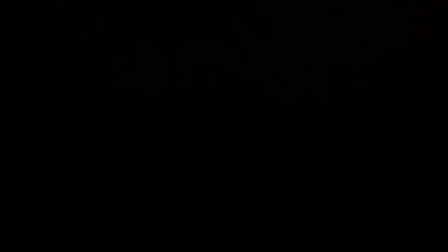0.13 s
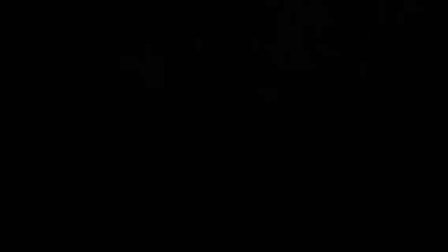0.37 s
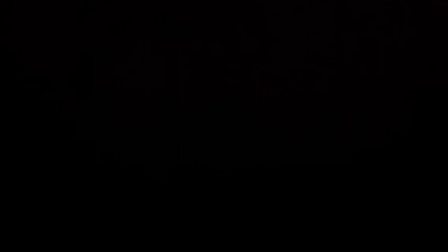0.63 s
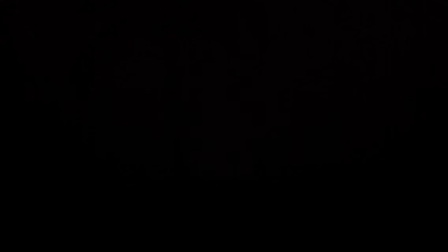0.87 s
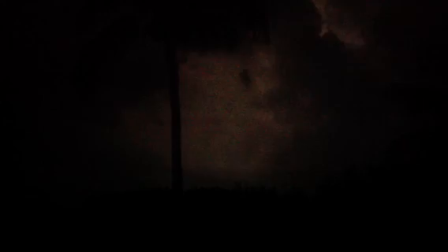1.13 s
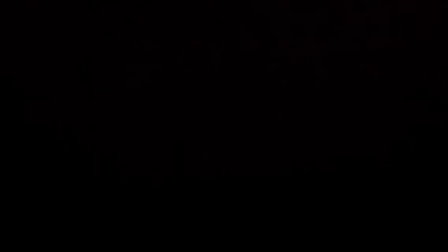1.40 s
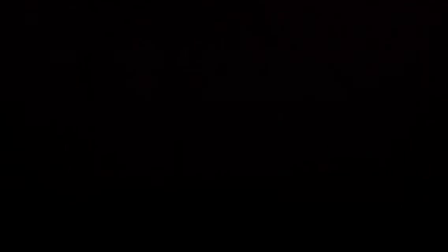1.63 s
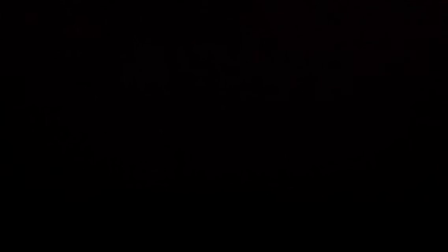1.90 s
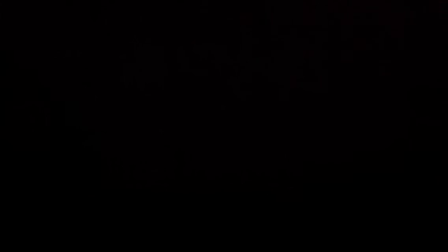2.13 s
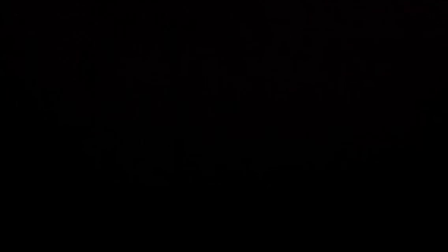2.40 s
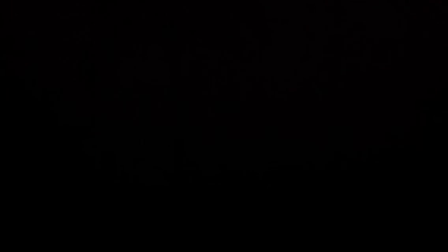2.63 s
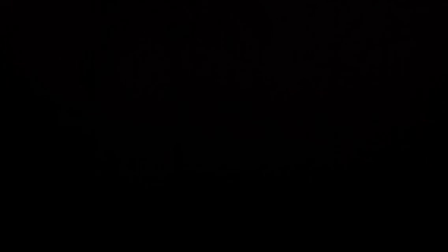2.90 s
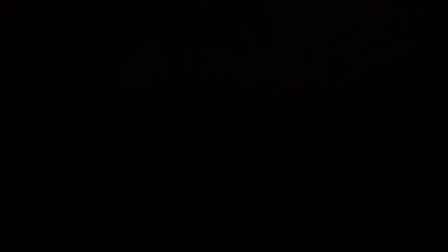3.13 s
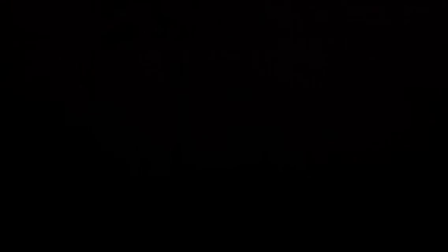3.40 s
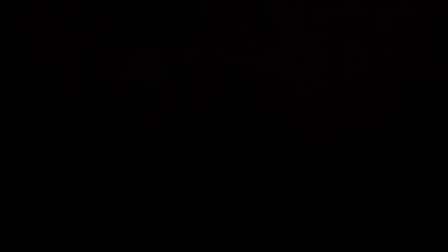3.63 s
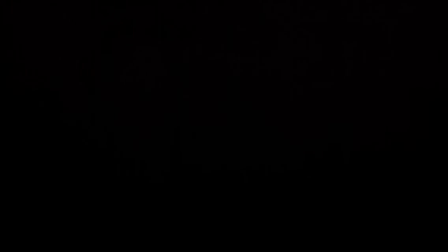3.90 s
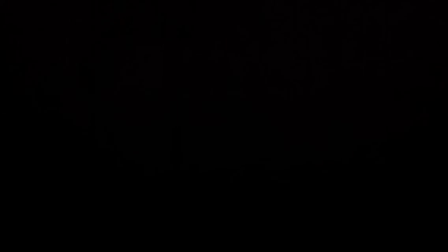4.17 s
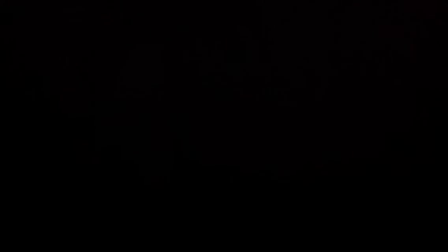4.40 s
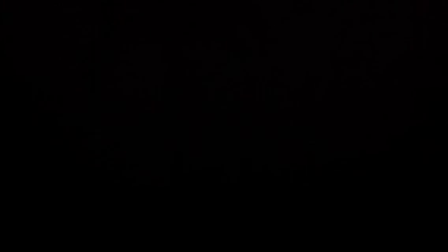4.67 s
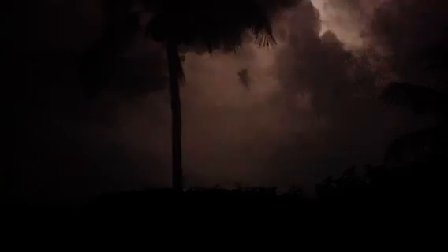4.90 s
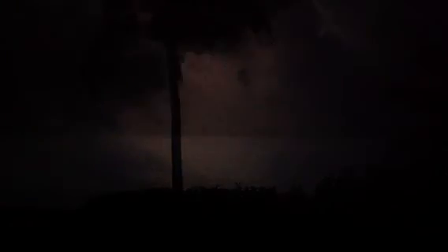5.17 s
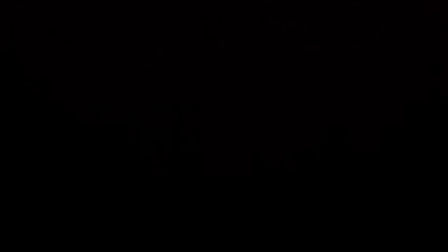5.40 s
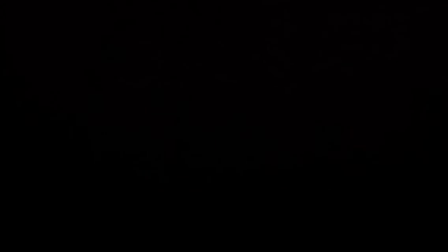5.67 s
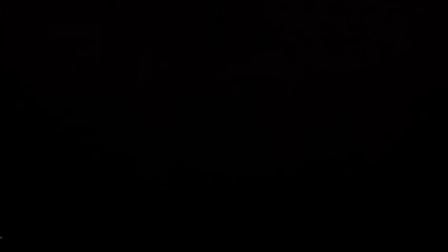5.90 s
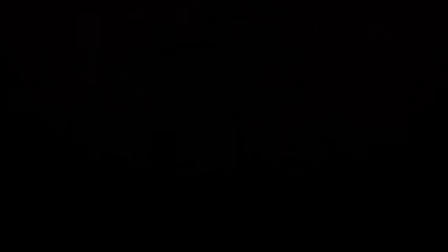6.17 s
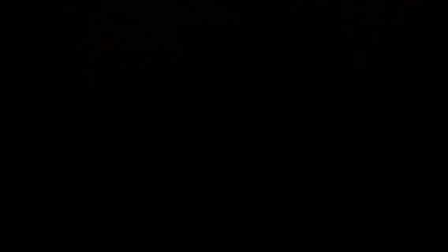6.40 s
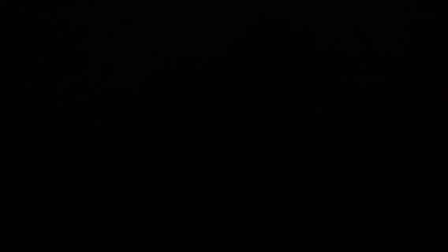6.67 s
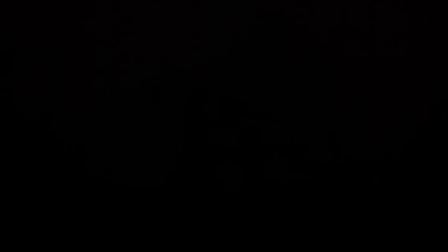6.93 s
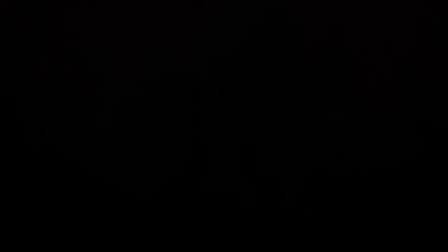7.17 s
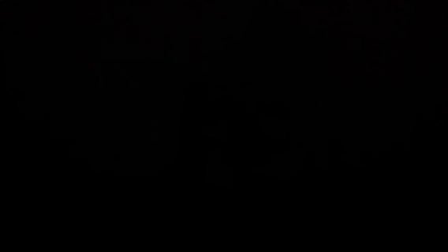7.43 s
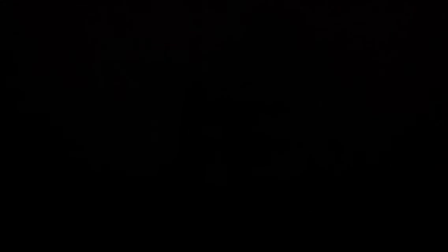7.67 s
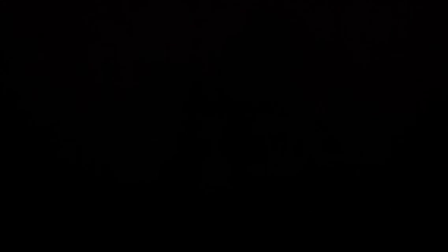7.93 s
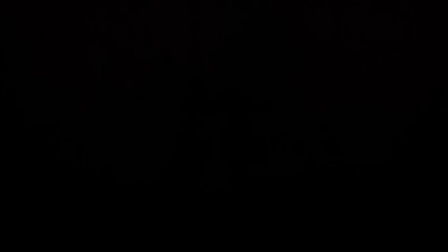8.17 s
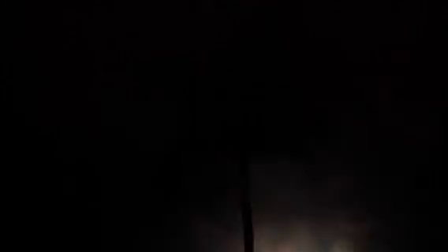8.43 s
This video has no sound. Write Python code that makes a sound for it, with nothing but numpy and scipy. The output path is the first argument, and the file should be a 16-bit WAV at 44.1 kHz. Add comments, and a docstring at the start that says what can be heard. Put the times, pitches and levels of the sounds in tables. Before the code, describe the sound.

Night crickets near and far sing over low wavering thunder, with faint motor whine, sparse leaf drips and far rain slowly growing.

```python
"""A stormy night in a garden: from the start crickets chirp near and far, mostly in pairs of wing strokes,
while uneven thunder rolls with passing hums, a small motor whines and throbs, and microphone noise hisses.
Drops soon tick on leaves as bursts of noise; one plinks into water at 2 s, and the boom is strongest at 2.8 s.
A higher cricket sings often from 4 s on, as far rain, a pattering noise, grows louder.
After 6 s some steady motor tones swell and others sink; near the end the thunder booms again."""
import sys
import numpy as np
from scipy import signal
from scipy.fft import rfft, irfft, next_fast_len
from scipy.io import wavfile
from scipy.ndimage import uniform_filter1d, map_coordinates

SR = 44100
rng = np.random.default_rng(int(sys.argv[2]) if len(sys.argv) > 2 else 0)


def how_loud(loudness_db):
    """Turn decibels into a plain amplitude multiplier (0 dB gives 1, 20 dB gives 10)."""
    steps = np.asarray(loudness_db, float) / 20
    return 10 ** steps


def to_wav(sig):
    """Store sig (one row per channel, or 1-D mono) as 16-bit WAV at the path in sys.argv[1].

    Samples outside -1..1 are clipped; the rate is SR.
    """
    pcm = np.clip(np.atleast_2d(sig), -1, 1) * 32767
    pcm = np.round(pcm).astype(np.int16)
    wavfile.write(sys.argv[1], SR, pcm.T)  # frames by channels


N = 377055


def unit(x):
    """Bring to rms 1."""
    return x / np.sqrt(np.mean(x ** 2) + 1e-20)


def curves(rows):
    """Draw straight lines between table rows: one curve for each column after the time."""
    times, *columns = np.transpose(rows)
    return [np.interp(np.arange(N) / SR, times, column) for column in columns]


def wobble(rate_hz):
    """A smooth random curve through rate_hz random points a second."""
    points = rng.standard_normal(int(N * rate_hz / SR) + 4)
    return map_coordinates(points, [np.arange(N) * rate_hz / SR])


def noise(colour, lo_hz=0, hi_hz=SR):
    """Random noise with its spectrum shaped by a colour table, kept between two soft edges."""
    size = next_fast_len(N)
    hz = np.fft.rfftfreq(size, 1 / SR) + 1  # 1 Hz up, to avoid the log of zero
    table_hz, table_db = np.transpose(colour)
    gain = how_loud(np.interp(np.log(hz), np.log(table_hz), table_db))
    gain = gain / np.sqrt((1 + (lo_hz / hz) ** 12) * (1 + (hz / hi_hz) ** 12))
    return irfft(rfft(rng.standard_normal(size)) * gain, size)[:N]


def leaves(x, t60_s, wet_db):
    """Leaves scatter sound: the direct sound plus a dying noise tail, new every third of a second."""
    t, step = np.arange(SR // 2) / SR, SR // 3
    out = np.pad(x, (0, SR))
    for i in range(0, N, step):
        tail = rng.standard_normal(len(t)) * how_loud(-60 * t / t60_s)
        wet = signal.fftconvolve(x[i:i + step], tail / np.linalg.norm(tail))
        out[i:i + len(wet)] += how_loud(wet_db) * wet
    return out[:N]


def strokes(rows, hz, fall_hz, spread_hz, length_s=.032, octave=0):
    """Each wing stroke makes the wing ring: a short, almost pure tone whose pitch slides, fast at first."""
    out = np.zeros(N + SR)
    u = np.linspace(0, 1, round(length_s * SR))  # progress through one stroke
    ramp = np.clip(np.minimum(u, 1 - u) / .38, 0, 1)
    shape = np.sin(np.pi / 2 * ramp) ** 2  # soft start and end, level between
    for (time, db), (detune, start) in zip(rows, rng.standard_normal((len(rows), 2))):
        pitch = hz + spread_hz * detune + fall_hz * ((1 - u) ** 2 - .3)
        phase = 2 * np.pi * (np.cumsum(pitch) / SR + start)
        first = max(round(time * SR - len(u) / 2), 0)
        tone = np.sin(phase) + octave * np.sin(2 * phase)
        out[first:first + len(u)] += how_loud(db) * shape * tone
    return out[:N]


# Colour of the microphone noise: (pitch [Hz], level [dB per Hz])
MIC_COLOUR = [(420, -92), (700, -94.5), (1300, -98), (2000, -103), (3500, -107), (8000, -110),
              (12000, -109), (15000, -112)]


def microphone_hiss():
    """The microphone's own noise is steady and random."""
    return np.sqrt(SR / 2) * noise(MIC_COLOUR, lo_hz=400)  # the factor makes the table levels per Hz


# Loudness of the far rain before its patter: (time [s], level [dB])
RAIN_LEVEL = [(0, -72.5), (4.2, -67.5), (6.8, -65), (8.55, -64.5)]
# Colour of the far rain, its overall loudness set above: (pitch [Hz], relative level [dB per Hz])
RAIN_COLOUR = [(1200, -19), (2500, -0.5), (5500, 0.5), (7200, -2), (9000, -6), (13000, -14.5)]


def far_rain():
    """Far rain on leaves blends into noise that patters unevenly and slowly comes nearer."""
    level_db, = curves(RAIN_LEVEL)
    patter_db = 1.6 * wobble(30)
    return how_loud(level_db + patter_db) * unit(noise(RAIN_COLOUR))


def crowd(hz, spread_hz, count):
    """Far crickets chirp pairs of strokes at random moments, mostly heard as echoes."""
    times, db = rng.uniform(0, N / SR, count), rng.normal(0, 2.5, count)
    pairs = np.r_[np.c_[times, db], np.c_[times + .053, db]]
    return unit(leaves(strokes(pairs, hz, fall_hz=90, spread_hz=spread_hz), t60_s=.35, wet_db=14))


# Far crickets: (time [s], level of the lower group [dB], level of the higher group [dB])
CHORUS_LEVEL = [(0, -69, -68), (3, -68.5, -69), (8.55, -71, -75)]


def chorus():
    """Two groups of far crickets sing, one mostly under and one over the near cricket's pitch."""
    lower_db, higher_db = curves(CHORUS_LEVEL)
    lower = crowd(6380, spread_hz=125, count=300)
    higher = crowd(6700, spread_hz=25, count=240)
    return how_loud(lower_db) * lower + how_loud(higher_db) * higher


# Strength of the boom before its own wandering: (time [s], level [dB])
THUNDER_LEVEL = [(0.0, -52.5), (1.08, -56.5), (1.36, -49.5), (1.93, -49), (2.3, -52.5), (2.8, -46.5),
                 (4.05, -50.5), (4.3, -57.5), (4.88, -52.5), (5.03, -49), (5.3, -52), (6.2, -52.5),
                 (7.1, -52), (7.45, -49), (7.64, -52), (7.79, -48), (7.9, -53), (8.55, -53)]
# Colour of the roll, shared by its three parts: (pitch [Hz], relative level [dB per Hz])
THUNDER_COLOUR = [(25, -40), (45, -34.5), (85, -11), (129, -2.5), (188, 0.5), (259, -1), (398, -19.5),
                  (520, -33.5), (700, -53)]


def thunder():
    """Far thunder is low noise; the boom swells unevenly, its deep part and upper edge follow only a little."""
    boom_db, = curves(THUNDER_LEVEL)
    swell_db = boom_db - boom_db.mean()
    t = np.arange(N) / SR
    deep_db = -58 + .2 * swell_db + 1.1 * wobble(1.5)
    edge_db = -61 + .35 * swell_db + .35 * (t - t.mean())  # the edge slowly rises
    deep = how_loud(deep_db) * unit(noise(THUNDER_COLOUR, hi_hz=154))
    edge = how_loud(edge_db) * unit(noise(THUNDER_COLOUR, lo_hz=295))
    boom = how_loud(boom_db + 1.8 * wobble(5)) * unit(noise(THUNDER_COLOUR, lo_hz=147.4, hi_hz=295))
    return deep + edge + boom


# Low hums that stand out of the roll for a while, before their wavering:
# (start time [s], end time [s], pitch [Hz], level [dB rms])
LOW_HUMS = [(0, .9, 137.2, -61), (.8, 1.453, 97.8, -61), (1.75, 2.25, 185.7, -55.5),
            (2.606, 3.1, 202.9, -50.5), (3.62, 4.64, 139.5, -55), (4.94, 5.167, 222.3, -54.5),
            (7.695, 7.836, 203.7, -50), (7.67, 7.846, 382, -63.5)]


def hums():
    """Low tones fade in and out softly and waver a little in pitch and loudness."""
    t, out = np.arange(N) / SR, 0
    for start, end, hz, db in LOW_HUMS:
        gate = np.clip(np.minimum(t - start, end - t) / .17 + .5, 0, 1)  # half open at start and end
        phase = 2 * np.pi * np.cumsum(hz + .89 * wobble(2.97)) / SR
        out = out + np.sqrt(2) * how_loud(db + 1.3 * wobble(3.3)) * gate * np.sin(phase)
    return out


# Motor speed, told by its loudest tone; it bends all tones by its ratio to the average:
# (time [s], pitch of the loudest tone [Hz])
MOTOR_SPEED = [(0, 2815.6), (1.15, 2815.7), (1.6, 2817.7), (2.05, 2817.5), (2.7, 2815.1), (3.65, 2816.9),
               (4.15, 2813.5), (4.9, 2815.6), (5.4, 2814.5), (5.8, 2814.7), (6.1, 2816.6), (6.8, 2815.8),
               (7.2, 2814), (8, 2815.6), (8.55, 2814.6)]
# Late swell of the motor and the turning wheel's lead: (time [s], swell level [dB], lead [rad])
MOTOR_LOAD = [(0, 0, -.55), (3.6, 0, .14), (4.3, 0, -.2), (5, 0, .12), (6.05, 0, .16), (6.4, 5, -.7),
              (8.55, 4.6, -.35)]
# Tones at whole multiples ("orders") of the shaft speed from 17 up, before flutter: (level [dB rms])
SINGLE_TONES = [-77.5, -80.5, -72.5, -77.5, -89, -76.5]
# Orders from 38 up, split in two by the wheel, before flutter: (lower level [dB rms], upper level [dB rms])
SPLIT_TONES = [(-82, -86), (-99, -99), (-89, -78), (-86, -77.5), (-77.5, -80), (-73.5, -76.5),
               (-63.3, -68.8), (-84, -85.5)]
# Other motor tones, before speed changes and flutter:
# (pitch [Hz], level [dB rms], share of the late swell taken [ratio])
OTHER_TONES = [(598.9, -79, 1.2), (635.2, -74, .9), (671.6, -76.5, .5), (1119.7, -79.5, -1.6),
               (1200.5, -75, .1), (1539.4, -85, 1.4), (1603.5, -83.5, 1)]


def motor():
    """Gear tones follow the shaft speed; a slow wheel splits the upper ones into beating pairs."""
    shaft_hz, wheel_hz = 64.14, 6.705
    speed_hz, = curves(MOTOR_SPEED)
    swell_db, lead_rad = curves(MOTOR_LOAD)
    t = np.cumsum(speed_hz / speed_hz.mean() + 6e-5 * wobble(6)) / SR  # time as the motor counts it
    jitter_rad = .17 / 44 * wobble(90)  # fast unevenness; the loudest tone, order 44, gets 44 times this
    shaft = 2 * np.pi * shaft_hz * t + jitter_rad
    wheel = 2 * np.pi * wheel_hz * np.arange(N) / SR + lead_rad + .08 * wobble(5)
    flutter = [how_loud(1.5 * wobble(4)) for _ in range(5)]  # the tones do not waver all together

    def tone(phase, db, k):
        """One steady tone with one of the flutters."""
        return np.sqrt(2) * how_loud(db) * flutter[k % len(flutter)] * np.sin(phase)

    def fade_db(k):
        """These orders sink while the late swell rises."""
        return -1.3 * swell_db * (k in (18, 19, 20, 38, 40, 43))

    def order_phase(k):
        """Phase of a shaft order, staggered by the order squared."""
        return k * shaft + .68 * k * k

    out = 0
    for k, (hz, db, share) in enumerate(OTHER_TONES):
        out = out + tone(2 * np.pi * hz * t, db + share * swell_db, k)
    for k, db in enumerate(SINGLE_TONES, start=17):
        out = out + tone(order_phase(k), db + fade_db(k), k)
    # at higher speed the loudest pair evens out and throbs deeper
    even_db = 2.4 * np.maximum(speed_hz - 2816.2, 0)
    for k, (below_db, above_db) in enumerate(SPLIT_TONES, start=38):
        turn = wheel + 1.55 * (k - 44)  # neighbouring orders throb in turn
        below_db = below_db + fade_db(k) - even_db * (k == 44)
        above_db = above_db + fade_db(k)
        out = out + tone(order_phase(k) - turn, below_db, k)
        out = out + tone(order_phase(k) + turn, above_db, k + 2)
    return out


def noise_band(lo_hz, hi_hz, count):
    """A burst of random noise between two pitches."""
    sos = signal.butter(2, [lo_hz, hi_hz], "band", fs=SR, output="sos")
    return signal.sosfilt(sos, rng.standard_normal(count))


# Drops on leaves, before the crack's own shape: (time [s], level [dB], pitch where the leaf sounds [Hz])
LEAF_DROPS = [(.3346, -56, 5400), (.768, -55, 4600), (1.1987, -53, 5200), (1.7774, -53, 4600),
              (2.6484, -54, 4700), (3.787, -57, 3900), (4.2178, -54, 11500), (4.9906, -52, 4100),
              (5.327, -53, 5500), (5.903, -56, 5600), (6.4562, -57, 4200), (7.0259, -53, 4100),
              (7.2993, -54, 3300), (7.6485, -54, 5000), (8.403, -55, 4000)]


def leaf_drops():
    """A drop on a leaf is a short crack coloured by that leaf, over a faint broad spatter."""
    out, t = np.zeros(N + SR), np.arange(SR // 20) / SR
    for time, db, hz in LEAF_DROPS:
        crack = 1.9 * noise_band(hz / 1.25, hz * 1.25, len(t))
        spatter = .9 * noise_band(2500, 9000, len(t))
        shape = how_loud(db - 60 * t / .06) * (1 - np.exp(-t / .0015))
        out[round(time * SR):][:len(t)] += shape * (crack + spatter)
    return out[:N]


# A drop into a puddle, before the ring's own shape: (time [s], level [dB], pitch [Hz])
PUDDLE_DROP = (1.997, -44.5, 1560)


def puddle_drop():
    """A drop into water plinks: two close tones start at once and die quickly."""
    out, t = np.zeros(N + SR), np.arange(SR // 20) / SR
    time, db, hz = PUDDLE_DROP
    ring = np.sin(2 * np.pi * hz * t) + .45 * np.sin(2 * np.pi * 1.1 * hz * t)
    shape = how_loud(db - 60 * t / .035) * (1 - np.exp(-t / .00021))
    out[round(time * SR):][:len(t)] += shape * ring
    return out[:N]


# The crickets heard singly, by name; a fall below 0 is a rise:
# (pitch [Hz], fall [Hz], pitch scatter [Hz], stroke length [s], echo level [dB])
CRICKETS = {"near": (6500, 20, 4, .037, -8), "behind": (6515, 40, 13, .032, -2),
            "bright": (6480, -240, 10, .04, -4), "low": (6450, -120, 7.8, .032, -5),
            "high": (6695, 100, 8.2, .032, -3)}
# Their rhythm, by name: (time from stroke to stroke [s], level change from stroke to stroke [dB])
CRICKET_RHYTHM = {"near": (.0533, .2), "behind": (.053, -1), "bright": (.054, -2), "low": (.051, -.2),
                  "high": (.049, -2)}
# Their chirps: (cricket, time at the middle of the first stroke [s], level before echo [dB], strokes [count])
CRICKET_CHIRPS = [("near", .089, -41.5, 2), ("bright", .132, -40.5, 2), ("behind", .225, -57, 1),
                  ("high", .29, -58, 2), ("near", .397, -42, 2), ("bright", .434, -45, 2),
                  ("behind", .647, -54.5, 1), ("near", .689, -39.5, 2), ("bright", .74, -41, 2),
                  ("near", .972, -41, 2), ("behind", 1.139, -52.5, 1), ("bright", 1.185, -44, 2),
                  ("low", 1.321, -48.5, 2), ("near", 1.429, -40.5, 2), ("behind", 1.562, -52, 2),
                  ("low", 1.642, -47, 2), ("bright", 1.73, -47.5, 2), ("behind", 1.753, -50.5, 1),
                  ("near", 1.792, -42, 2), ("behind", 1.96, -49.5, 1), ("low", 1.989, -49, 2),
                  ("bright", 2.095, -46.5, 2), ("near", 2.136, -41, 2), ("behind", 2.257, -53, 1),
                  ("low", 2.314, -48.5, 2), ("near", 2.419, -39.5, 2), ("behind", 2.527, -53, 3),
                  ("behind", 2.751, -53, 1), ("near", 2.81, -41.5, 2), ("bright", 2.835, -48, 2),
                  ("behind", 3.055, -54, 3), ("near", 3.32, -42.5, 2), ("behind", 3.467, -53, 2),
                  ("near", 3.673, -42.5, 2), ("behind", 3.822, -55.5, 2), ("near", 4.087, -43, 2),
                  ("high", 4.126, -50, 2), ("near", 4.413, -41.5, 2), ("bright", 4.47, -49, 1),
                  ("high", 4.481, -53, 2), ("behind", 4.539, -54.5, 3), ("high", 4.803, -49, 2),
                  ("near", 4.807, -43, 2), ("behind", 4.938, -51.5, 1), ("high", 5.025, -57, 2),
                  ("near", 5.093, -41.5, 2), ("high", 5.137, -49, 2), ("behind", 5.345, -52, 1),
                  ("near", 5.372, -42, 2), ("high", 5.456, -52, 2), ("near", 5.678, -42.5, 2),
                  ("high", 5.76, -51.5, 2), ("behind", 5.936, -53, 1), ("near", 5.995, -41.5, 2),
                  ("high", 6.027, -49, 2), ("behind", 6.25, -55, 2), ("high", 6.308, -49.5, 2),
                  ("near", 6.491, -45, 2), ("high", 6.603, -49.5, 2), ("near", 6.766, -44, 2),
                  ("behind", 6.82, -52, 2), ("high", 6.906, -49.5, 2), ("near", 7.086, -42.5, 2),
                  ("behind", 7.2, -55, 3), ("high", 7.218, -50.5, 3), ("near", 7.465, -42.5, 2),
                  ("high", 7.513, -52, 3), ("behind", 7.555, -51.5, 2), ("near", 7.772, -42.5, 2),
                  ("high", 7.841, -48, 3), ("behind", 7.916, -55, 1), ("high", 8.149, -52, 2),
                  ("near", 8.153, -40.5, 2), ("behind", 8.333, -51.5, 3), ("high", 8.472, -51.5, 2)]


def soloists():
    """Each cricket chirps one to three wing strokes in its own rhythm, blurred by echoes from the leaves."""
    out = 0
    for name, (hz, fall_hz, spread_hz, length_s, echo_db) in CRICKETS.items():
        gap_s, change_db = CRICKET_RHYTHM[name]
        rows = []
        for who, time, db, count in CRICKET_CHIRPS:
            if who == name:
                rows += [(time + k * gap_s, db + k * change_db) for k in range(round(count))]
        octave = how_loud(-21) * (name == "bright")  # only this cricket sounds its octave
        song = strokes(rows, hz, fall_hz, spread_hz, length_s, octave)
        out = out + leaves(song, t60_s=.32, wet_db=echo_db)
    return out


def cut_gaps(x, under_db, up_db, down_db):
    """Cuts gaps into the faint hiss at loud chirps: parts of the spectrum below a moving limit are removed."""
    hz, _, z = signal.stft(x, SR, nperseg=2048, noverlap=1536)
    power = abs(z) ** 2
    chirp = uniform_filter1d(power[(hz > 6200) & (hz < 6900)].sum(axis=0), size=5, origin=1)
    treble = uniform_filter1d(power[(hz > 7500) & (hz < 11000)].sum(axis=0), size=80)  # its slow level
    # the limit rises with the chirp band, up to a ceiling that follows the treble
    chirp = np.minimum(chirp, how_loud(-51) ** 2 * treble / treble.mean())
    octaves = np.log2(np.maximum(hz, 1) / 6700)
    drop_db = np.where(octaves > 0, up_db, -down_db) * octaves  # the limit falls per octave away
    limit = how_loud(under_db - drop_db) ** 2
    loud_enough = uniform_filter1d(power, size=15, axis=0) > limit[:, None] * chirp
    keep = loud_enough & (hz < 15280)[:, None]  # nothing is kept above this pitch
    return signal.istft(z * keep, SR, nperseg=2048, noverlap=1536)[1][:N]


def scene():
    """Everything reaches one microphone."""
    background = microphone_hiss() + far_rain() + chorus() + thunder() + hums()
    return (background + motor() + leaf_drops() + puddle_drop() + soloists())[None]


def low_pass(x):
    """Removes everything above the highest recorded frequency."""
    return signal.sosfilt(signal.butter(12, 15280, fs=SR, output="sos"), x)


def record(dry):
    """Gaps are cut into the faint hiss at loud chirps, then the mix is finished."""
    gapped = cut_gaps(dry[0], under_db=-40.2, up_db=9.5, down_db=35)
    return low_pass(gapped[None])


dry = scene()
out = record(dry)
to_wav(out)
```